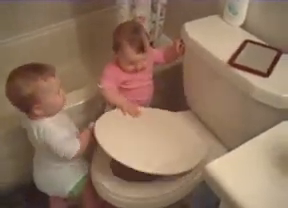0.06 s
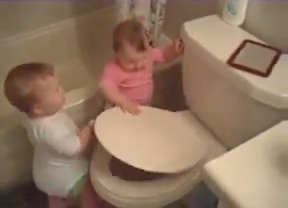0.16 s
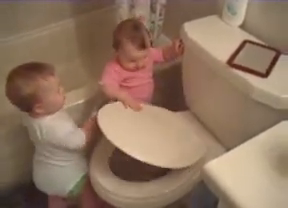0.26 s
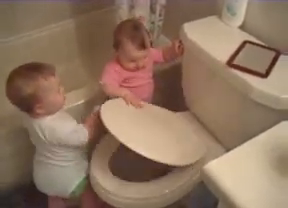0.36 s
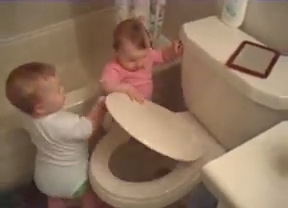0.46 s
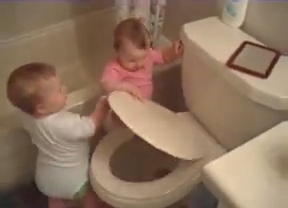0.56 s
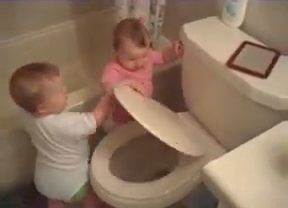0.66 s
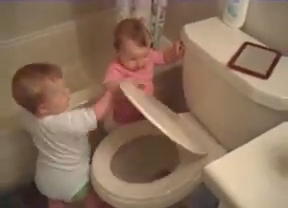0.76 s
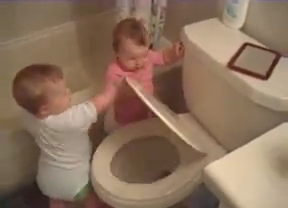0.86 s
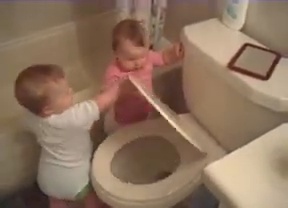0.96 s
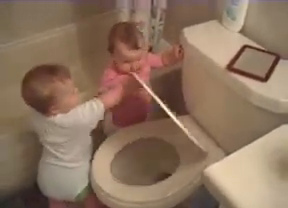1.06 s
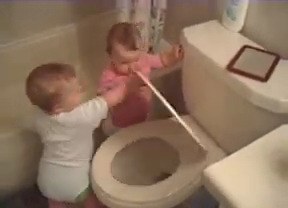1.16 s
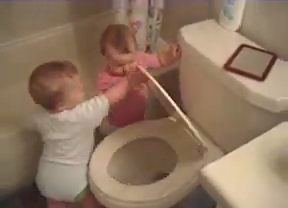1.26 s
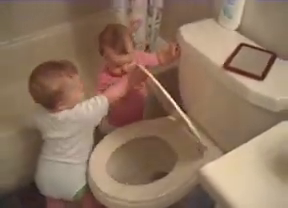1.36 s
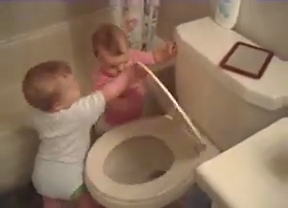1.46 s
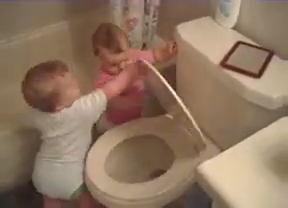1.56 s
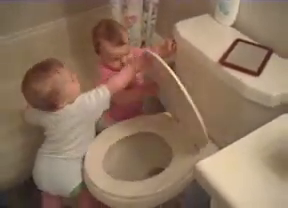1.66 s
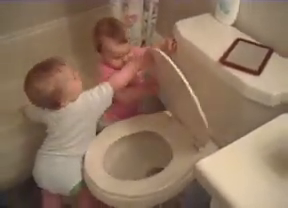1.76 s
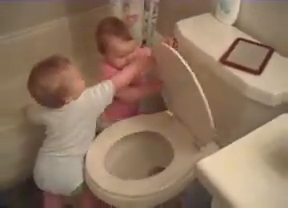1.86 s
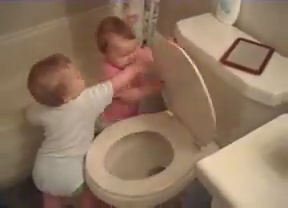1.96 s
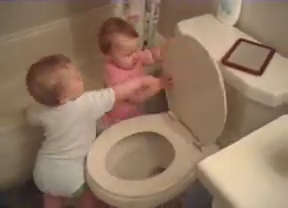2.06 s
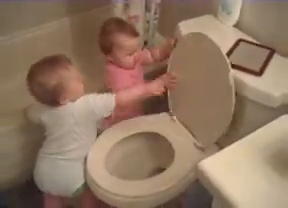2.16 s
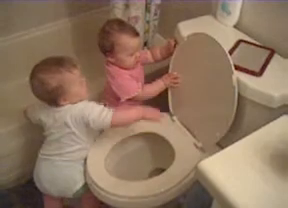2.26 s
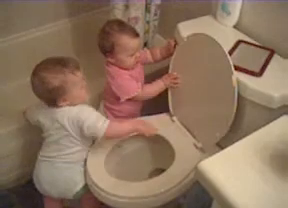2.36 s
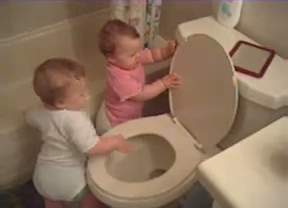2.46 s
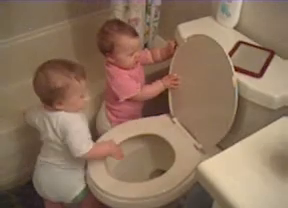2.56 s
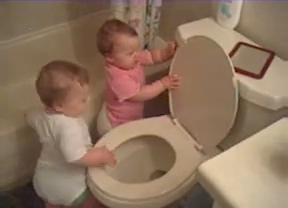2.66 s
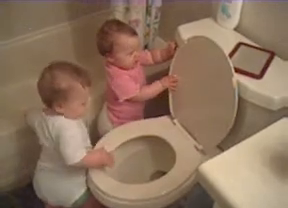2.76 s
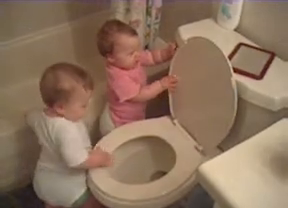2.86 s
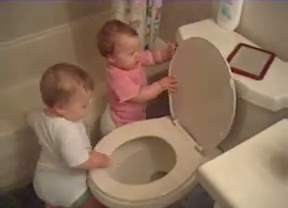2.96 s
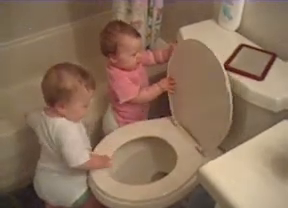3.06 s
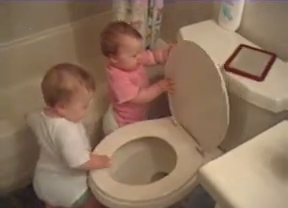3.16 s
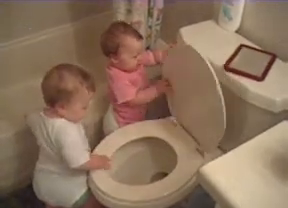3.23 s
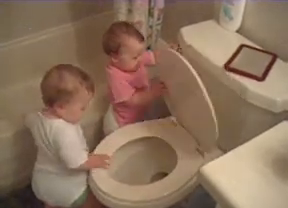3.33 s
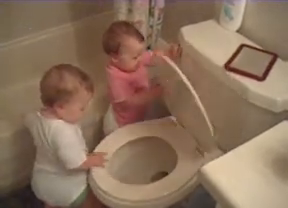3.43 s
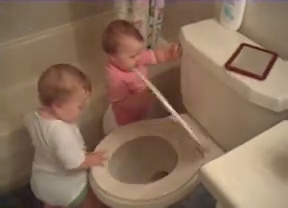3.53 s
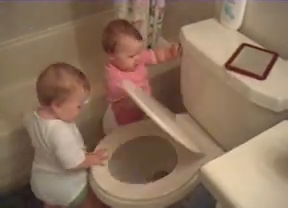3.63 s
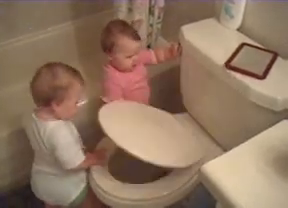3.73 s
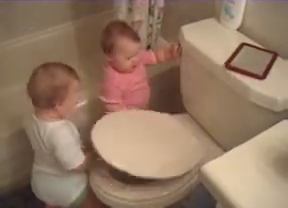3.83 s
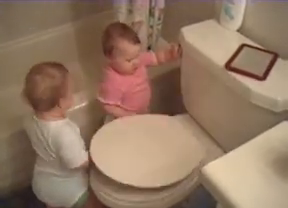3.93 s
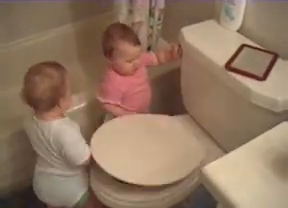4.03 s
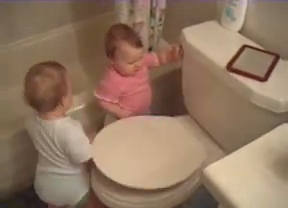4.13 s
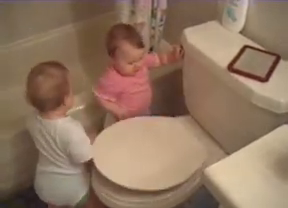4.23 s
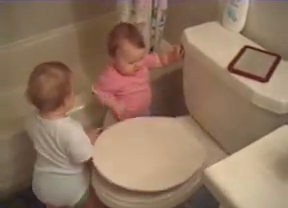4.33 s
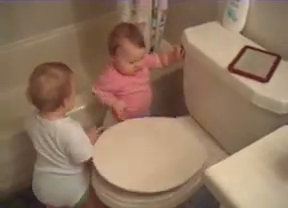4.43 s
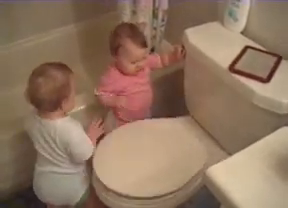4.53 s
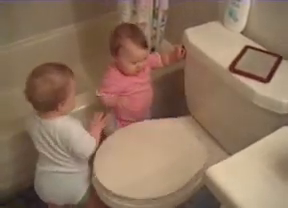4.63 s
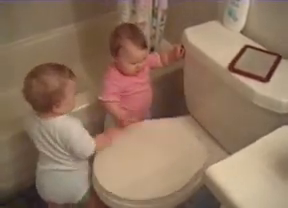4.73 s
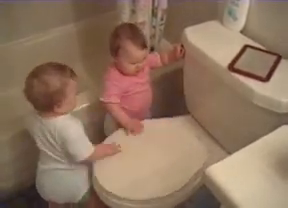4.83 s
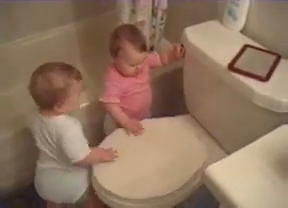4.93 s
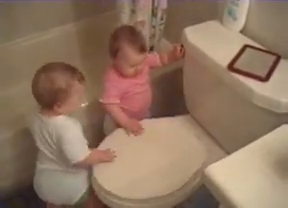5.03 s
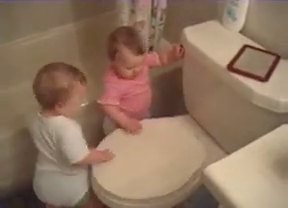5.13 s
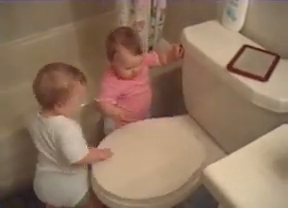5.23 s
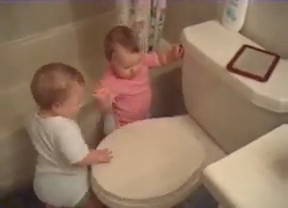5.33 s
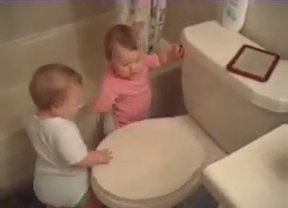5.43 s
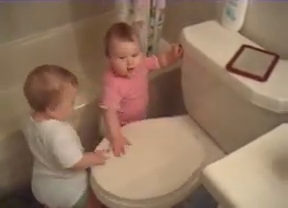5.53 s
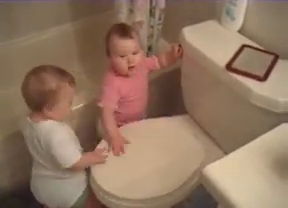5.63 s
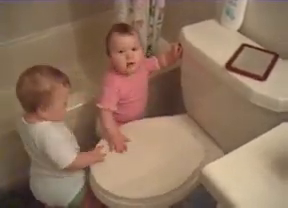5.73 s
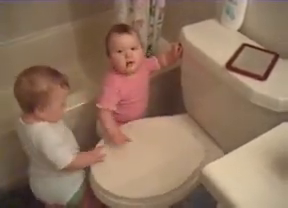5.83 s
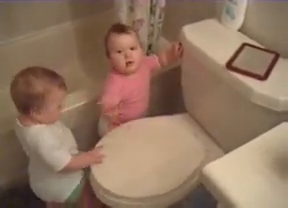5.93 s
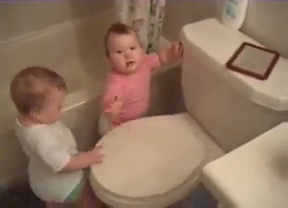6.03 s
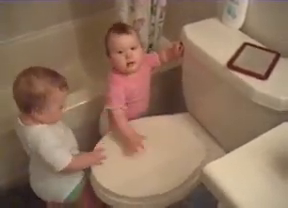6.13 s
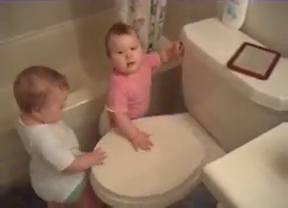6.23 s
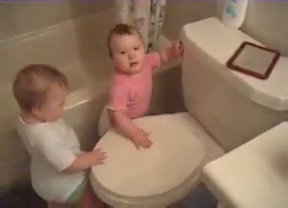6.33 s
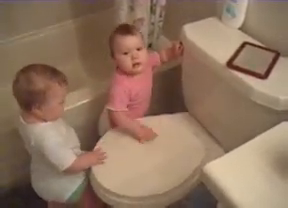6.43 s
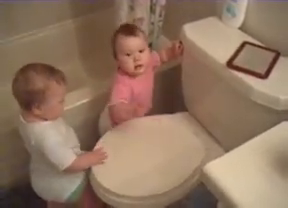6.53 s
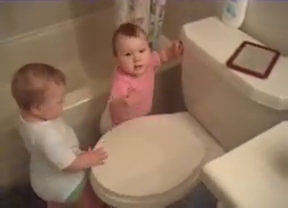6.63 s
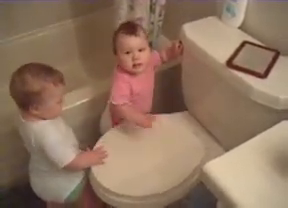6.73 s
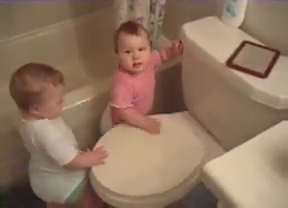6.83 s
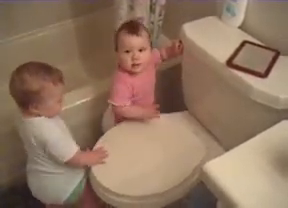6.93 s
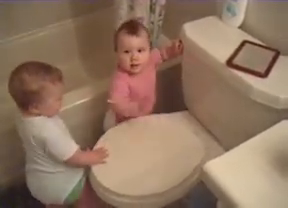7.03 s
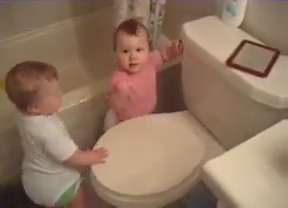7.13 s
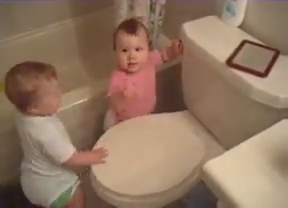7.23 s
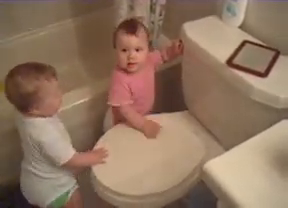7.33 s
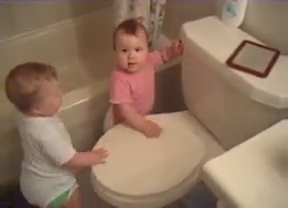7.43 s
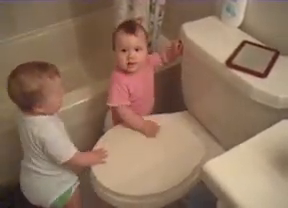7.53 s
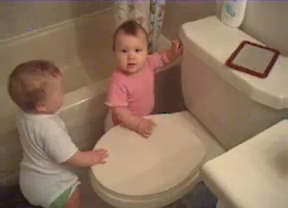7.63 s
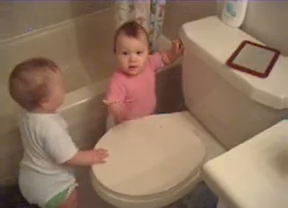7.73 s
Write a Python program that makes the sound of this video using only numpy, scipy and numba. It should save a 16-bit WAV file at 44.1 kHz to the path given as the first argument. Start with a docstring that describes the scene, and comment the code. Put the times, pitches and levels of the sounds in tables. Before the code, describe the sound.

Sharp plastic knocks and a clattering toilet lid slam, followed by small hand slaps on the lid, over faint hiss.

```python
"""In a small tiled bathroom, two toddlers play with a toilet lid. It bangs as it is raised, knocks on its
hinge, slams shut and bounces; then a small hand slaps it so that it clacks against the seat. Each hit is
a crack of plastic, a ring of lid and bowl, and an echo off the tiles, over a faint hiss and hum.
It is all heard through a little camera that cuts the high treble, quickly turns loud sounds down,
distorts with a low thud on the slams and twice stalls for a moment."""
import sys
import numpy as np
from scipy import signal
from scipy.fft import rfft, irfft
from scipy.io import wavfile
from numba import njit

SR = 44100
rng = np.random.default_rng(int(sys.argv[2]) if len(sys.argv) > 2 else 0)


def transcribe(u):
    """Save the signal u as a 16-bit wav file named by the first command-line argument.

    u: samples, shape (n,) or (channels, n), limited to [-1, 1]; the rate is SR.
    q: integer samples, one column per channel.
    """
    v = np.clip(np.atleast_2d(u).T, -1, 1)
    q = np.round(v * 32767).astype(np.int16)
    wavfile.write(sys.argv[1], SR, q)


N = 343274
TIME = np.arange(N) / SR

# The lid is shoved up, slams and bounces, or is driven onto the seat.
# start_s, level_db, bass_db, pitch_hz, thud_s (how long the low thud lasts)
BANGS = [(1.474, -11.5, 0, 454, .025), (3.907, -9.5, -2, 1200, 0.051), (3.947, -15, -14, 950, 0.035),
         (3.998, -7.5, -5, 1210, .009), (4.008, -15, 0.5, 780, .022), (4.051, -14.5, -13, 340, .026),
         (4.089, -13, -11, 1100, .034), (6.706, -16, -8, 566, 0.0071), (6.713, -24, -2, 880, 0.0051),
         (6.720, -26.5, -13, 1090, 0.022)]

def bangs():
    """The lid's hard edge hits the seat or tank: very short, bright hits."""
    return sum(hit(start_s, level_db, pitch_hz, contact_s=0.00073, bass_db=bass_db, bowl_db=1.5)
               for start_s, level_db, bass_db, pitch_hz, _ in BANGS)


# A hand slaps the closed lid, and a clack follows.
# start_s, level_db, contact_s, pitch_hz, bowl_db, clack_level_db, clack_pitch_hz
SLAPS = [(4.818, -14, 0.0045, 370, 3.5, -27.5, 250), (5.441, -19.5, 0.01, 241, -6, -22.5, 234),
         (6.063, -26.5, 0.0067, 400, 6.5, -57, 343), (6.660, -23, 0.0026, 340, 4.5, -17, 170),
         (7.371, -19.5, 0.0076, 210, 5, -24, 200)]

def slaps(clack_after_s=0.034, neutral_contact_s=0.026):
    """A soft palm sounds brighter the harder and quicker it lands; the lid gives and clacks on the seat."""
    track = np.zeros(N)
    palm = dict(bass_db=1.5, pitch_boost_db=9.5)  # pinning the lid down brings out the pitch strongly
    for start_s, level_db, contact_s, pitch_hz, bowl_db, clack_db, clack_hz in SLAPS:
        treble_db = 0.67 * (level_db - 20 * np.log10(contact_s / neutral_contact_s))
        track += hit(start_s, level_db, pitch_hz, contact_s, bowl_db, treble_db=treble_db, **palm)
        track += hit(start_s + clack_after_s, clack_db, clack_hz, contact_s=0.0005,
                     bowl_db=bowl_db + 6, **palm)
    return track


# The raised lid knocks on its hinge. start_s, level_db, contact_s, pitch_hz
KNOCKS = [(1.532, -14.5, 0.0093, 800), (1.562, -20, 0.008, 520), (3.280, -20, 0.0038, 282)]

def knocks():
    """The loose hinge takes up its slack: thin knocks with little bass."""
    return sum(hit(start_s, level_db, pitch_hz, contact_s,
                   bowl_db=-2, bass_db=-13, treble_db=-2, pitch_boost_db=10)
               for start_s, level_db, contact_s, pitch_hz in KNOCKS)


# Light ticks of fingers and hinge. start_s, level_db, pitch_hz
TICKS = [(.121, -42, 794), (.944, -45, 3380), (3.668, -60.5, 2500), (4.687, -56.5, 2800),
         (6.15, -51.5, 2940), (6.345, -54, 5220), (7.045, -55.5, 2260), (7.196, -58, 2970)]

def ticks(neutral_hz=1460):
    """Small touches barely stir the bowl; a higher tick is also brighter."""
    return sum(hit(start_s, level_db, pitch_hz, contact_s=0.00078, bowl_db=-4, bass_db=-15,
                   treble_db=6 * np.log2(pitch_hz / neutral_hz))
               for start_s, level_db, pitch_hz in TICKS)


# The tones each part rings with. pitch_hz, level_db, fade_s (time to drop by 60 dB)
RAISED_LID_TONES = [(303.6, -9.5, 0.059), (297.6, -14, 0.46), (336, 13, 0.036), (506.5, -16.5, 0.37),
                    (661, -14, 0.33), (821, -14.5, 0.27), (1110, -29.5, 0.073), (1276, -17.5, 0.38),
                    (1840, -16, 0.24), (1850, -21, .18), (2486, -15, 0.24), (2970, -22, 0.19)]  # lid standing free on its hinge
CLOSED_LID_TONES = [(198.2, -5, 0.26), (240.1, -11, 0.32), (253, -0.5, 0.096), (344.8, -6, 0.25),
                    (368, -9.5, 0.16), (421, -1, 0.071), (491, -6.5, 0.085), (528.3, -3.5, 0.11),
                    (1263, -10, 0.062), (1428, -14, 0.2), (1550, -10, 0.15), (1925, -12.5, .22),
                    (2273, -19, 0.33), (2850, -8.5, 0.17), (2890, -20, 0.15), (3190, -11, 0.22),
                    (3670, -15, 0.24), (4230, -27.5, 0.067)]  # lid lying on the seat
BOWL_TONES = [(693.2, -11, 0.24), (743, -5.5, 0.1), (1098, -15.5, 0.29)]  # porcelain bowl
LID_FALLS_S = 3.8

def hit(start_s, level_db, pitch_hz, contact_s, bowl_db, bass_db, treble_db=0, pitch_boost_db=6.5):
    """One hit: the plastic cracks, lid and bowl ring, the room echoes. A longer contact swells slower."""
    t = TIME[:20000]
    lid_tones = CLOSED_LID_TONES
    if start_s < LID_FALLS_S:
        lid_tones = RAISED_LID_TONES
        bowl_db -= 8  # only the hinge carries the hit to the bowl
    sound = crack(t) + ring(lid_tones, t) + gain(bowl_db) * ring(BOWL_TONES, t) + gain(4) * room_echo(t)
    sound = touch_colour(sound, bass_db, treble_db, pitch_hz, pitch_boost_db)
    swell = 1 - np.exp(-t / contact_s)
    return place(start_s, gain(level_db) * sound * swell)


def ring(tones, t):
    """A struck part rings with fading tones, each about 1 dB louder or softer from hit to hit."""
    sound = np.zeros(len(t))
    for pitch_hz, level_db, fade_s in tones:
        strength = gain(level_db + rng.standard_normal())
        sound += strength * np.sin(2 * np.pi * (pitch_hz * t + rng.random())) * fade(t, fade_s)
    return sound


def touch_colour(sound, bass_db, treble_db, pitch_hz, pitch_boost_db, bass_hz=420, treble_hz=1800):
    """A soft hand gives bass, a hard edge treble; the spot that is hit brings out one pitch."""
    size = 2 * len(sound)
    hz = np.fft.rfftfreq(size, 1 / SR) + 1
    bass = bass_db / (1 + (hz / bass_hz) ** 4)
    treble = treble_db / (1 + (treble_hz / hz) ** 4)
    peak = pitch_boost_db / (1 + (np.log2(hz / pitch_hz) / 0.12) ** 2)  # 0.12 octaves to each side
    return irfft(rfft(sound, size) * gain(bass + treble + peak), size)[:len(sound)]


# The noisy clatter of a hit, from low to high. pitch_hz, level_db
CLATTER_SPECTRUM = [(40, -25.5), (130, 1), (230, -0.5), (380, -3), (600, -3.5), (1000, -4.5), (1700, -3.5),
                    (2900, -2), (4200, -5), (5500, -7), (7000, -10.5)]

def crack(t, fade_s=0.057, echo_gain=0.39, echoes=3):
    """A short crack of plastic, made hollow by echoes off the tank, tub and wall a hand's width away."""
    burst = noise(CLATTER_SPECTRUM, len(t)) * fade(t, fade_s)
    delays_s = rng.uniform(0.0008, 0.0036, echoes)
    reflected = sum(place(delay_s, burst)[:len(t)] for delay_s in delays_s)
    return gain(6) * (burst + echo_gain * reflected) / np.sqrt(1 + echoes * echo_gain ** 2)


# How long the tiled room rings, from low to high. pitch_hz, fade_s
ROOM_FADES = [(150, 0.39), (400, 0.29), (1000, 0.23), (2800, 0.24), (6500, 0.24)]

def room_echo(t, build_s=0.00073):
    """Echoes between the tiles thicken within milliseconds; each octave fades at its own pace."""
    clatter = rfft(noise(CLATTER_SPECTRUM, len(t)))
    hz = np.fft.rfftfreq(len(t), 1 / SR)
    octaves_hz = 125 * 2. ** np.arange(7)
    echo = np.zeros(len(t))
    for centre_hz, share in zip(octaves_hz, np.eye(len(octaves_hz))):
        band = irfft(clatter * read_curve(np.c_[octaves_hz, share], hz), len(t))
        echo += band * fade(t, read_curve(ROOM_FADES, centre_hz))
    return echo * (1 - np.exp(-t / build_s))


def distortion_thuds(bang_db=-11.5, slap_db=-18, slap_thud_s=0.038, hard_slap_db=-16, delay_s=0.003):
    """Bangs and hard slaps come with short, flat-topped low thuds of distortion, alternating in sign."""
    thuds = [(start_s, bang_db, thud_s) for start_s, *_, thud_s in BANGS]
    thuds += [(start_s, slap_db, slap_thud_s) for start_s, db, *_ in SLAPS if db > hard_slap_db]
    track = np.zeros(N)
    for count, (start_s, level_db, thud_s) in enumerate(sorted(thuds)):
        kick_db = 5 * np.exp(-TIME[:int(thud_s * SR)] / 0.005)  # starts high, then settles
        track += place(start_s + delay_s, (-1) ** count * gain(level_db + kick_db))
    return gentle_filter(track, 450, "low")


def limiter(sound, limit_db=-13.5, ratio=6, attack_s=0.0018, release_s=0.0089):
    """Turns the sound down when its treble is loud; the first milliseconds of a slam get through."""
    treble = gentle_filter(sound, 1300, "high")
    loudness = follow(np.abs(treble), 1 / (attack_s * SR), 1 / (release_s * SR))
    return sound / np.maximum(loudness / gain(limit_db), 1) ** (1 - 1 / ratio)


# The moments when the sound stalls. stop_s, resume_s, catch_up_s
STALLS = [(1.638, 1.740, 1.92), (6.450, 6.546, 6.64)]

def stall(sound):
    """The sound drops out briefly, goes on from where it stopped, then skips ahead to catch up."""
    stalled = sound.copy()
    for stop, resume, catch_up in (np.array(STALLS) * SR).astype(int):
        stalled[stop:resume] = 0
        stalled[resume:catch_up] = sound[stop:stop + catch_up - resume]
    return stalled


# The background hiss, from low to high. pitch_hz, level_db
HISS_SPECTRUM = [(18, -43.5), (30, -20.5), (59, -6.5), (87, -5), (102, -14), (123, -0.5), (147, -7.5),
                 (259, -2), (408, -7), (535, -9), (1240, -11), (2190, -13), (2680, -9.5), (6800, -17.5),
                 (8840, -77), (15000, -120)]

def hiss_and_hum(hiss_db=-51, hum_db=-63, hum_hz=120):
    """A steady hiss with a faint hum from the mains power."""
    hum = np.sqrt(2) * np.sin(2 * np.pi * hum_hz * TIME)
    return gain(hiss_db) * noise(HISS_SPECTRUM, N) + gain(hum_db) * hum


def gain(db):
    """Turn decibels into a number to multiply by."""
    return 10 ** (np.asarray(db) / 20)


def read_curve(points, hz):
    """Read between (pitch_hz, value) points, with octaves evenly spaced."""
    pitches_hz, values = np.transpose(points)
    return np.interp(np.log(hz + 1), np.log(pitches_hz), values)


def noise(spectrum, size):
    """Noise with the given spectrum and an average strength (rms) of 1."""
    shape = gain(read_curve(spectrum, np.fft.rfftfreq(size, 1 / SR)))
    return irfft(rfft(rng.standard_normal(size)) * shape, size) / np.sqrt(np.mean(shape ** 2))


def gentle_filter(sound, edge_hz, keep):
    """Keep the "low" or the "high" side of a sound."""
    return signal.sosfilt(signal.butter(1, edge_hz, keep, fs=SR, output="sos"), sound)


def fade(t, fade_s):
    """Die away, dropping 60 dB in fade_s."""
    return np.exp(-np.log(1000) * t / fade_s)


def place(start_s, sound):
    """Put a sound on a silent track as long as the scene."""
    return np.r_[np.zeros(int(start_s * SR)), sound, np.zeros(N)][:N]


@njit
def follow(levels, rise, fall):
    """Follow a level smoothly, rising and falling at different speeds."""
    smooth, level = np.empty(len(levels)), 0.
    for i in range(len(levels)):
        level += (levels[i] - level) * (rise if levels[i] > level else fall)
        smooth[i] = level
    return smooth


def scene():
    """The lid over the quiet bathroom, in mono."""
    return (bangs() + ticks() + knocks() + slaps() + hiss_and_hum())[None]


def record(dry, band_hz=7000, ceiling=0.73, top_hz=16400):
    """The camera limits, thuds, stalls and cuts the high treble; flattened peaks splash above that cut."""
    sound = stall(limiter(dry[0]) + distortion_thuds())
    narrow = signal.sosfilt(signal.ellip(12, .2, 80, band_hz, fs=SR, output="sos"), sound)
    flattened = np.clip(narrow, -ceiling, ceiling)
    return signal.sosfilt(signal.ellip(8, .2, 70, top_hz, fs=SR, output="sos"), flattened)[None]


dry = scene()
out = record(dry)
transcribe(out)
```